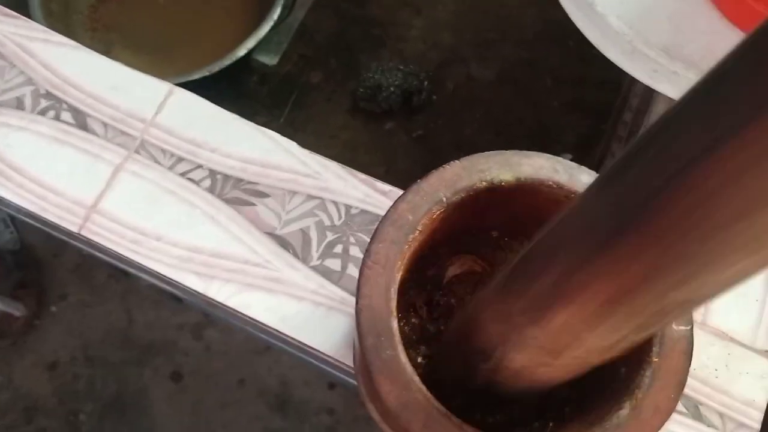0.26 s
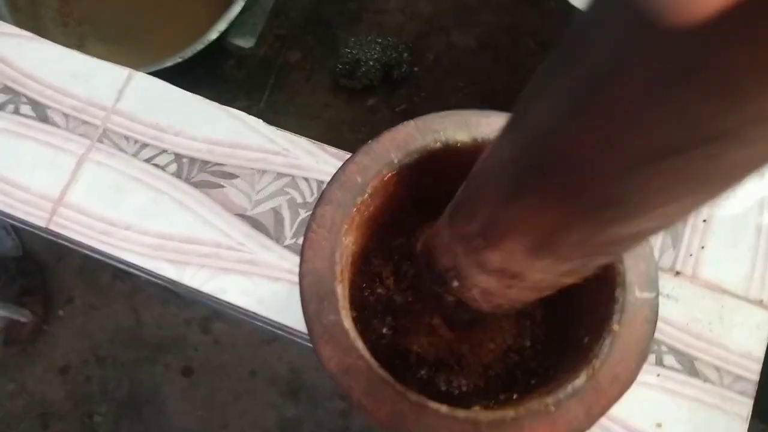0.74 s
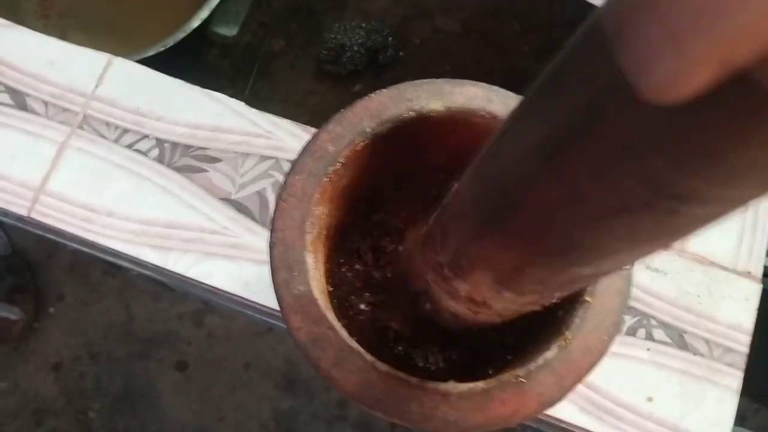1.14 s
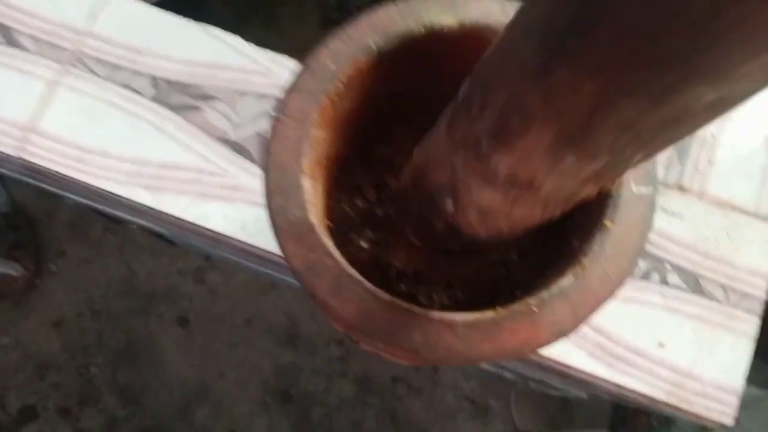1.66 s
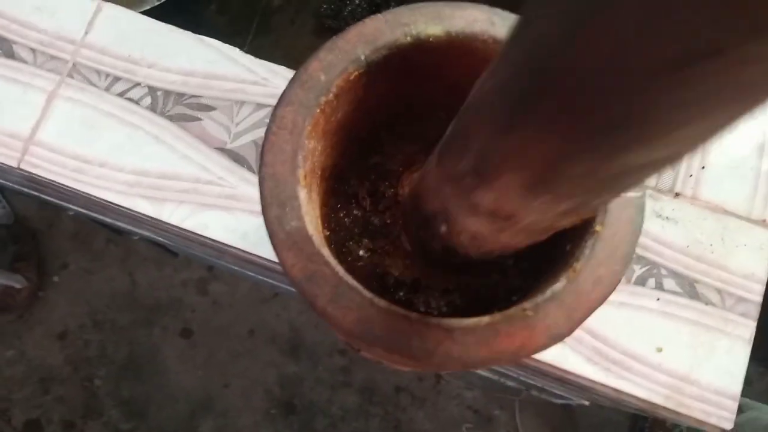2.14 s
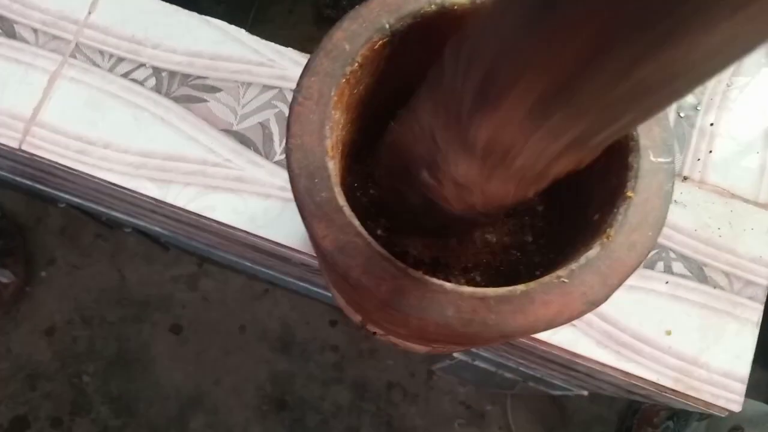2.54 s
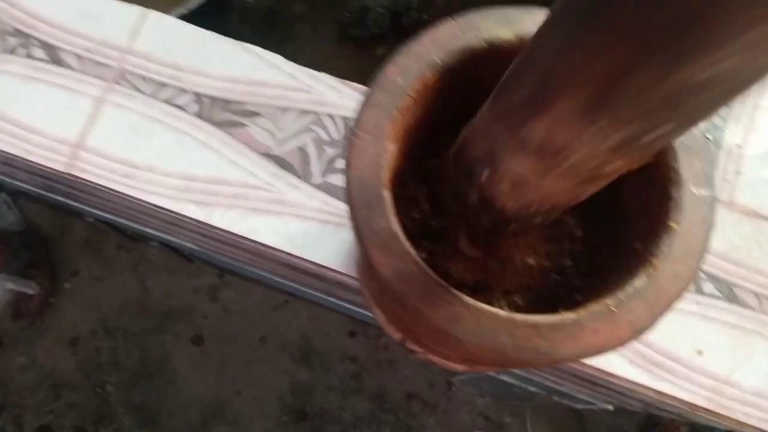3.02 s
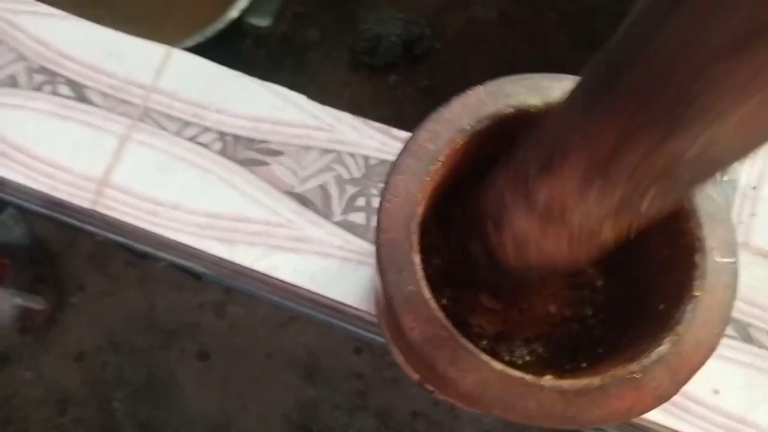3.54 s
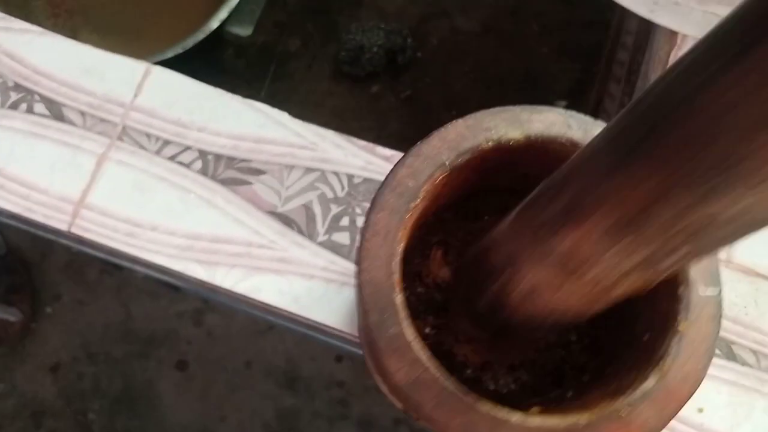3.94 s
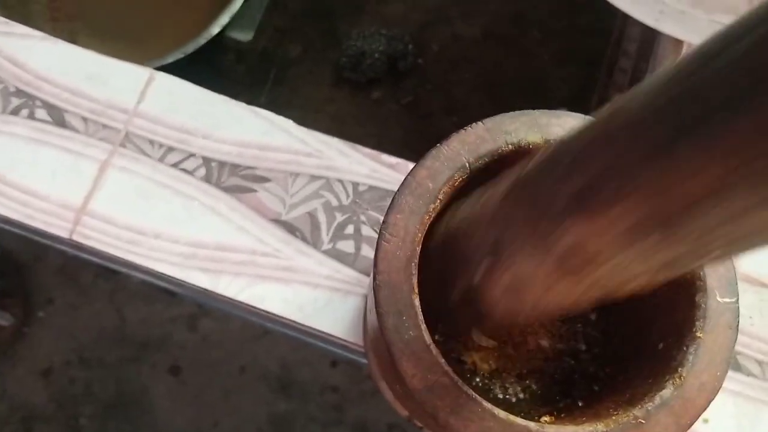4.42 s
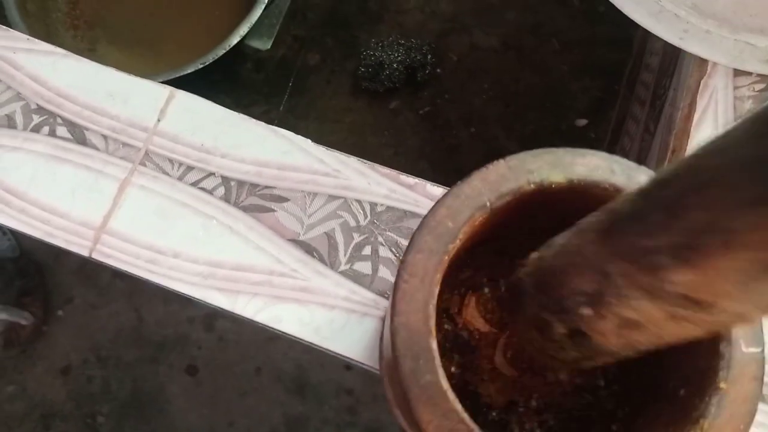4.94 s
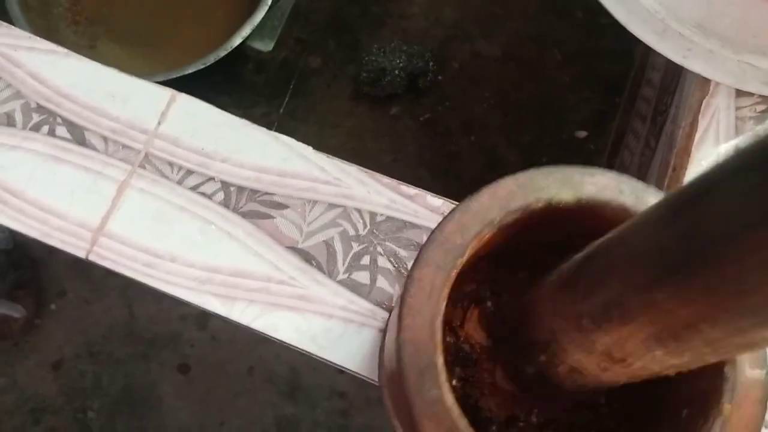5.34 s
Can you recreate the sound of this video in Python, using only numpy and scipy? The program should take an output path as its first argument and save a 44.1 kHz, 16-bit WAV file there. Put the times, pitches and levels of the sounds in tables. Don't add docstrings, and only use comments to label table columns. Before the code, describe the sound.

Rapid regular wooden knocks, about three or four a second, crush spices in a heavy bowl while a hard-walled room echoes each blow.

```python
import sys
import numpy as np
from scipy import signal
from scipy.fft import rfft, irfft, next_fast_len
from scipy.io import wavfile
from scipy.ndimage import uniform_filter1d

SR = 44100
rng = np.random.default_rng(int(sys.argv[2]) if len(sys.argv) > 2 else 0)


def master_out(mix):
    frames = np.transpose(np.atleast_2d(mix))
    ceiling = np.clip(frames, -1, 1)
    pcm = np.round(ceiling * 32767).astype(np.int16)
    wavfile.write(sys.argv[1], SR, pcm)


def amplitude_ratio(level_db):
    exponent = np.asarray(level_db, float) / 20
    return 10 ** exponent


N = 245637
TAIL = 2 ** 15
CONTACT_S = 0.00055
SHOVE_CYCLES = 0.42
DUCK_DB, DUCK_PER_FORCE, DUCK_PER_DRY = 5.5, 0.55, 1
CEILING = 0.74

# pitch in Hz, level in dB per Hz.
HUM_COLOUR = [(25, -14), (100, -1.5), (500, 6.5), (1500, -17), (3400, -39), (6500, -45), (8000, -54),
              (13500, -47), (15000, -45), (16500, -48)]
# pitch in Hz, time in seconds to fall by 60 dB.
ROOM_RING = [(60, 1.51), (200, 1.01), (400, 1.07), (900, 1.22), (2000, 0.96), (3500, 0.97), (6000, 0.82),
             (9000, 0.41), (15000, 0.31)]
# pitch in Hz, level in dB.
MIC_COLOUR = [(25, -5.5), (70, -2), (7300, -4.5), (8100, -6.5), (13500, -5), (14600, 2), (15800, -1),
              (16400, -30), (22000, -55)]
# pitch in Hz, level in dB per Hz.
HISS_COLOUR = [(3000, -25.5), (13300, -29), (14300, 1), (15800, -10), (16200, -49.5), (22000, -83)]

# time in seconds, peak in dB, pitch in Hz, length in ms.
SEED_SNAPS = [(0.0178, -26, 5400, 0.59), (0.022, -37, 6540, 1.2), (0.0483, -26.5, 5970, 0.85),
              (.068, -32, 5300, 3), (0.071, -31, 6600, 4.6), (1.7772, -50, 12000, 0.55),
              (1.835, -10.5, 5400, 0.36), (2.106, -39, 9500, 0.66), (2.362, -30, 5800, 0.38),
              (2.957, -18, 3360, 0.89), (2.9615, -9, 6150, 0.31), (2.964, -28, 3660, 3.6),
              (4.09, -38, 2400, 2.6), (4.0905, -36, 5400, 0.67), (4.117, -28, 3720, 0.52),
              (4.117, -28.5, 1590, 1.1), (4.143, -36, 4770, 2.4), (4.464, -30.5, 3250, 1.3),
              (4.92, -36, 13400, 0.34), (4.925, -12.5, 5260, 0.25), (5.15, -11.5, 5740, 0.33),
              (5.154, -22, 5940, 0.55), (5.161, -25, 5470, 0.92), (5.307, -35.5, 6300, 4.5),
              (5.308, -38, 4440, 4), (4.463, -23, 1430, 1.5), (0.3717, -11, 1940, 1.95),
              (1.2361, -5.5, 4980, 1.1), (4.849, -11, 2030, 1.3)]
# time in seconds, peak in dB, pitch in Hz.
SHOVES = [(0.0386, -10, 523), (0.0612, -9.2, 490), (0.3726, -16, 940.0), (0.6754, 4.5, 1033),
          (0.9478, 3, 1010), (1.2368, -12, 734), (1.5344, -5.5, 513), (1.8123, -10.5, 680),
          (2.0927, -9, 870), (2.3353, -8.5, 612), (2.3732, -9, 720), (2.6726, -2, 920), (2.9476, -8, 570),
          (3.254, -7.5, 1070), (3.5778, 7.5, 1010), (3.9804, -10, 840), (4.2644, 5.3, 1005),
          (4.5536, 0.3, 820), (4.8494, -2.3, 920), (5.1148, -14, 660.0), (5.1445, -13.5, 600.0),
          (5.4185, -5.5, 952), (2.401, -13, 432), (5.13, -13, 444)]

# pitch in Hz, width in Hz, level in dB.
SPICE_MODES = [
    (0, [(3700, 690, 0)]),
    (0, [(6960, 810, 0)]),
    (0, [(8920, 2100, 0)]),
    (0, [(11900, 3600, 0)]),
]
PESTLE_MODES = [
    (0, [(5730, 920, -1.3), (6300, 550, 0.21)]),
    (0, [(4420, 350, 0)]),
    (0, [(4930, 470, -11), (5160, 1160, -2)]),
    (0, [(14800, 900, -2), (15900, 800, 1)]),
]
RIM_MODES = [
    (0, [(1480, 120, 6.8), (1650, 280, 3.5)]),
    (0, [(1956, 130, -3), (2080, 190, -4.5)]),
    (0, [(3368, 322, 1.5), (3620, 430, -1.5)]),
    (0, [(2400, 1100, -4.5), (2620, 620, -3.5)]),
]
BOWL_MODES = [
    (6, [(697, 152, 2), (808, 153, 4), (890.5, 45, 4)]),
    (-5.5, [(55, 29, -31), (97, 59, -9), (128.6, 9.4, -6.5), (193.6, 75, -5), (263, 34.6, -1.5), (309, 26.5, -2), (359, 63, -5)]),
    (-10.5, [(419, 13, -4), (464, 152, -5), (512.7, 11, -4.5), (563, 65, -5.5)]),
    (9, [(1108, 204, 2), (1244, 86, 6)]),
]

# time in seconds, force in dB,
# dryness in dB (contact over its echo).
BLOWS = [(-0.2, 1.6, -2.4), (0.037, -8.5, -7), (0.0595, -4.5, -1.5), (0.369, -1.3, -1.2), (0.674, 5, 1),
         (0.9457, 4, 0.1), (1.234, 2.2, 0), (1.5327, 0.4, 0.2), (1.81, 2, -1), (2.09, 0.8, 0.5),
         (2.3345, -10.5, -9.3), (2.37, 2.5, -0.0), (2.671, 3.5, -1), (2.946, -3.0, 0), (3.25, 0.5, -1.5),
         (3.576, 4, 1), (3.977, -0.5, -0.3), (4.263, 5, -1), (4.5523, 2, -1.2), (4.847, 5, -1.4),
         (5.1135, -3.5, -7.5), (5.1427, -7, -0.2), (5.417, -2.5, 1.5)]
LANDING = [(0.3, 1.6, 0.29, -1), (-2.5, -0.26, 2, 1), (-1.95, 1, -0.44, 0.1), (0.5, -0.96, -0.74, -0.6),
           (1, 0.18, 0.28, 1.5), (2.5, 1.5, 0.31, 1), (-1.36, -0.49, 0.17, 0.4),
           (-1.16, -1.66, -1.45, -0.8), (-0.8, 1, -0.72, 2.46), (1.5, -1.33, -0.055, -1.5),
           (1.3, -2.6, 0.0, 0), (0.1, 1.77, -1.4, 2.6), (0.55, -0.5, -0.6, -1.26), (-1.64, -0.2, -1.37, 0),
           (0.6, -0.35, -2.13, -0.5), (1.07, 0.12, 1.36, 0.5), (-0.5, 0.012, 1.5, -1.54),
           (0.7, 0.76, 0.81, 1.55), (0.05, -0.5, 0.97, 0.4), (0.4, 0.46, 0.73, -0.8), (0.1, 0.86, 1.1, 1),
           (-0.2, 1.8, -0.12, -1.2), (1.5, -1.13, 0.97, 0.9)]
# steps of dust thrown up (0 = usual), extra crack of the spices in dB,
# how much later the bowl answers in ms.
POWDER = [(3, 0, -0.29), (-8, -9, -0.88), (0.7, -9, 0.8), (0.5, -2.5, 0.36), (3.7, -6, 1.3),
          (1.5, -16, -0.33), (0.2, 0, -0.94), (-1.5, -10, -0.8), (-2, .5, 2.05), (0, 3, -0.9),
          (-2, 0, -2.2), (3, -11.5, 0.07), (0.2, -3, 0.34), (0.7, -13, -0.76), (2.95, -7, 1.83),
          (0.8, 10, -1.93), (-2.5, 14, -0.85), (2.4, -0.5, -0.94), (1.9, -4, -0.42), (1.1, 1, -0.91),
          (-3.5, 4, -1.36), (1.5, 5, -0.83), (3, 2, -1.62)]
GRIP = [(-1.1, 5.5), (-0.099, 3.5), (1.6, 1), (-1.0, 2.7), (0.53, 1.3), (1.2, -2), (1.7, 0.5), (0.82, 0),
        (-1.1, -3.3), (-0.7, 0.2), (1.2, -2.5), (1.5, -2), (-1.4, -0.3), (-0.42, -0.1), (-2.1, -0.4),
        (-0.2, 0.3), (0.2, 3.5), (-0.47, -0.4), (0.34, 1.8), (-1.6, -1.9), (0.38, 2), (0.43, 0.0),
        (-1.2, 2.5)]

# usual level in dB,
# then dB per landing step toward the rim, on the neck, square, on seeds.
SPICE_LAW = [(-31, 1.5, -1.2, -0.6, 5.5), (-32, -2, -0.62, 0.6, -3), (-42.5, -5.4, -0.6, 2, -0.3),
             (-49.5, -3.2, -1.0, -0.5, -6.5), (4, -0.5, -2.1, -5.5, 2.3)]
PESTLE_LAW = [(-23.5, -0.5, 0.4, -0.029, 1.56), (-33.5, -2.1, 2.2, -2.3, 1.5),
              (-30.5, 0.7, 1.6, -2.3, -0.78), (-47, -2.5, 0.2, -0.5, -0.5), (3.5, 0.5, 0.1, 0.41, -1.2)]
RIM_LAW = [(-29.5, 5, -0.4, -3, -0.1), (-35.5, -1.5, -2.5, -1.2, -1.5), (-28.5, -0.13, -0.6, -5, -1.5),
           (-38.5, 0.5, 7.5, 0.3, -1.7), (4.5, 0, -0.6, 2.1, 1.1)]
BOWL_LAW = [(-26.5, 2.1, -1.9, 1.56, -0.5), (-21, -0.53, -1.4, 0.77, -1), (-23.5, 0.5, -2.84, 1.6, -1.3),
            (-36.5, 3.5, 0.7, 3.5, 0.6), (6, -1, -1.2, 1.4, 0.1)]
# dB per step of tightness, dB per step of twist.
GRIP_DB = [(0.1, -0.15), (-0.45, 0.74), (0.7, 0.15), (-0.7, -0.91), (1.86, 1.14), (-3, 0.18), (1.04, -1.44),
           (0.0, 0.73), (-0.7, 0.54), (-1.5, -0.17), (0.9, 1.2), (-2, 0.0), (-0.3, 1.3), (0.0, -0.33),
           (-2, 1.1), (0.0, 0.0)]
# for one part, dB per step of dust, group by group.
DUST_DB = dict(pestle=[0.2, -0.3, 0.2, 2], spice=[-1.1, 3, 2.7, 2.7])
LAG_S = dict(bowl=0.00097, rim=-0.001092, pestle=-.0003, spice=-0.00022)
SNAP = dict(bowl=2.6, rim=1.8, pestle=.8, spice=.8)


def along(points, hz):
    f, v = np.transpose(points)
    return np.interp(np.log(hz + 1), np.log(f + 1), v)


def coloured(x, points):
    m = next_fast_len(N + 8192)
    gain = amplitude_ratio(along(points, np.fft.rfftfreq(m, 1 / SR)))
    return irfft(rfft(x, m) * gain, m)[..., :N]


def steady(points, db):
    noise = coloured(rng.standard_normal(N), points)
    return amplitude_ratio(db) * noise / noise.std()


def kitchen_hum():
    return steady(HUM_COLOUR, db=-45.5)


def puffs(events):
    half = 600
    out, t = np.zeros(N + SR), np.arange(-half, half) / SR
    for s, db, hz, ms in events:
        wobble = np.convolve(rng.standard_normal(len(t)), np.hanning(41) / 20, "same")
        waver = 0.25 * np.cumsum(wobble) * hz / SR
        swell = np.exp(-(1000 * t / ms) ** 2 / 2)
        puff = -np.cos(2 * np.pi * (hz * t + waver - waver[half])) * swell
        out[round(s * SR):][:len(t)] += amplitude_ratio(db) * puff
    return out[half:][:N]


def seeds_snapping():
    return puffs(SEED_SNAPS)


def paste_shoves():
    return puffs([(s, db, hz, SHOVE_CYCLES / hz / 0.0011) for s, db, hz in SHOVES])


def energy_one(x):
    return x / np.sqrt(np.sum(np.abs(x) ** 2, axis=-1, keepdims=True) + 1e-20)


def ringing(modes, hz, widen):
    rows = []
    for centre, width, db in modes:
        damping = 1j * hz * width * widen
        rows.append(amplitude_ratio(db) * damping / (centre * centre - hz * hz + damping))
    return np.array(rows)


def echoes(count, build_s, patchy_db):
    hz, t, z = signal.stft(rng.standard_normal((count, TAIL)), SR, nperseg=256)
    patches = uniform_filter1d(rng.standard_normal(z.shape), size=4, axis=1)
    patches = uniform_filter1d(patches, size=16, axis=2)
    fall_db = patchy_db * patches / patches.std() - 60 * t / along(ROOM_RING, hz)[:, None]
    tail = signal.istft(z * amplitude_ratio(fall_db), SR, nperseg=256)[1][:, :TAIL]
    build = 1 - np.exp(-np.arange(TAIL) / SR / build_s)
    return tail * build / np.sqrt(SR)


def blows(law, lag_s, order, dust_db=0, crack=0, sink=0):
    s, force_db, dry_db = np.transpose(BLOWS)
    dust, crack_db, sink_ms = np.transpose(POWDER)
    law = np.array(law)
    grip_db = np.reshape(GRIP_DB, (4, 4, 2))[order]
    levels = law[:, 0] + np.array(LANDING) @ law[:, 1:].T
    ring_db = levels[:, :-1] + force_db[:, None] + dust[:, None] * dust_db + np.array(GRIP) @ grip_db.T
    dry_db = levels[:, -1] + dry_db + crack * crack_db
    start = s + lag_s + sink * sink_ms / 1000
    return np.column_stack([start, ring_db[:, 0] + dry_db, ring_db[:, 1:] - ring_db[:, :1], -dry_db])


def struck(rows, body, direct_db, echo_db, build_s, widen, snap, near_db, patchy_db):
    rows, hz, t = np.array(rows), np.fft.rfftfreq(TAIL, 1 / SR), np.arange(TAIL) / SR
    crush = (t / CONTACT_S) ** 2 * np.exp(-t / CONTACT_S)
    near_wall = amplitude_ratio(near_db) * t / 0.0015 * np.exp(-t / 0.0031)
    contact = rfft(energy_one((crush + near_wall) * rng.standard_normal((len(rows), TAIL))))
    contact = contact + snap * np.exp(-2j * np.pi * hz * 2 * CONTACT_S)
    room = rfft(echoes(len(rows), build_s, patchy_db)) * amplitude_ratio(echo_db + rows[:, 5:])
    strength = amplitude_ratio(rows[:, 1:2] + np.pad(rows[:, 2:5], ((0, 0), (1, 0))))
    sound = 0
    for k, (share_db, modes) in enumerate(body):
        signs = (-1) ** np.arange(len(modes))
        held = signs @ ringing(modes, hz, widen) ** 2
        free = np.sqrt(np.sum(np.abs(ringing(modes, hz, 1)) ** 4, axis=0))
        near = energy_one(contact * held) * amplitude_ratio(direct_db + share_db)
        far = room * energy_one(free)
        sound = sound + strength[:, k:k + 1] * np.sqrt(len(hz)) * (near + far)
    out = np.zeros(N + 2 * TAIL)
    fade = np.clip(np.linspace(4, 0, TAIL), 0, 1) ** 2
    for s, wave in zip(rows[:, 0], irfft(sound, TAIL) * fade):
        out[TAIL + round(s * SR):][:TAIL] += wave
    return out[TAIL:][:N]


def spices_cracking():
    rows = blows(SPICE_LAW, LAG_S["spice"], order=3, dust_db=DUST_DB["spice"], crack=0.92)
    return struck(rows, SPICE_MODES, direct_db=21.5, echo_db=32, build_s=0.00088, widen=2.1,
                  snap=SNAP["spice"], near_db=-13, patchy_db=2.5)


def pestle_clack():
    rows = blows(PESTLE_LAW, LAG_S["pestle"], order=2, dust_db=DUST_DB["pestle"])
    return struck(rows, PESTLE_MODES, direct_db=27.5, echo_db=34.5, build_s=0.001, widen=1.35,
                  snap=SNAP["pestle"], near_db=-6.5, patchy_db=1.5)


def rim_knock():
    rows = blows(RIM_LAW, LAG_S["rim"], order=1)
    return struck(rows, RIM_MODES, direct_db=28.5, echo_db=35.0, build_s=0.001, widen=1.8,
                  snap=SNAP["rim"], near_db=-4, patchy_db=1.94)


def bowl_thud():
    rows = blows(BOWL_LAW, LAG_S["bowl"], order=0, sink=0.93)
    return struck(rows, BOWL_MODES, direct_db=21, echo_db=43.0, build_s=0.016, widen=3.8,
                  snap=SNAP["bowl"], near_db=-3.5, patchy_db=0.34)


def scene():
    background = kitchen_hum() + seeds_snapping() + paste_shoves()
    pounding = spices_cracking() + pestle_clack() + rim_knock() + bowl_thud()
    return (background + pounding)[None]


def gain_control(release_db, ahead_s):
    t, depth = np.arange(N) / SR, np.zeros(N)
    for s, force_db, dry_db in BLOWS:
        fall = np.clip(1 + (t - s) / ahead_s, 0, 1)
        duck_db = DUCK_DB + DUCK_PER_FORCE * force_db + DUCK_PER_DRY * dry_db
        depth = np.maximum(depth, fall * (duck_db - release_db * np.maximum(t - s, 0)))
    return amplitude_ratio(-depth)


def top_cut(x):
    return signal.sosfilt(signal.butter(12, 17000, fs=SR, output="sos"), x)


def record(dry):
    x = coloured(dry, MIC_COLOUR) * gain_control(release_db=92.5, ahead_s=0.025)
    x = x / (1 + np.abs(x / CEILING) ** 6) ** (1 / 6)
    mix = x + steady(HISS_COLOUR, db=-94)
    return top_cut(mix)


dry = scene()
out = record(dry)
master_out(out)
```